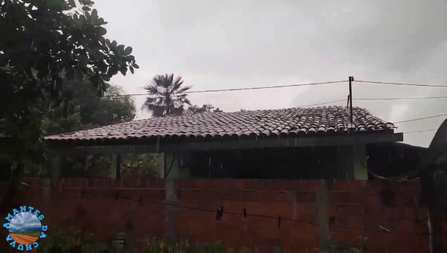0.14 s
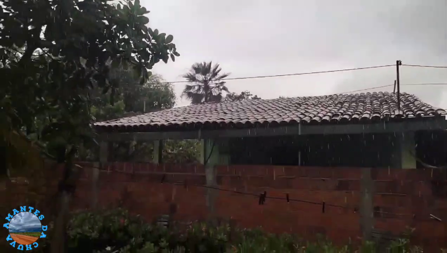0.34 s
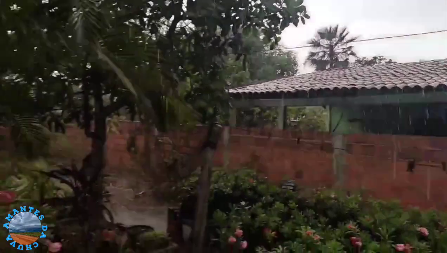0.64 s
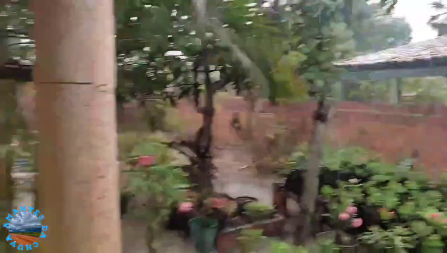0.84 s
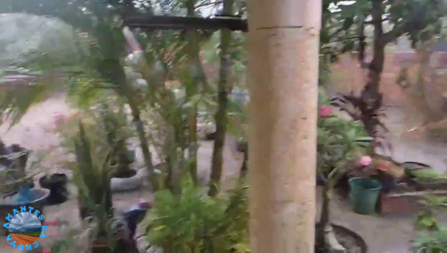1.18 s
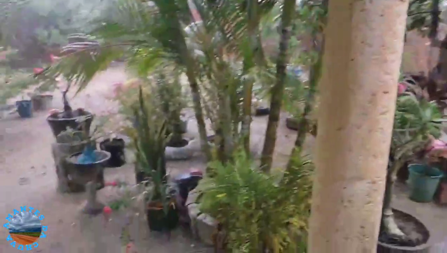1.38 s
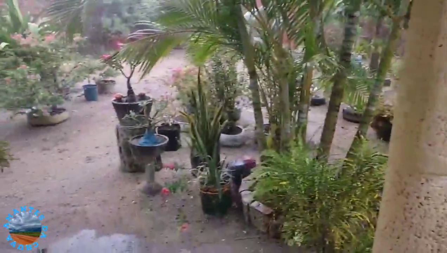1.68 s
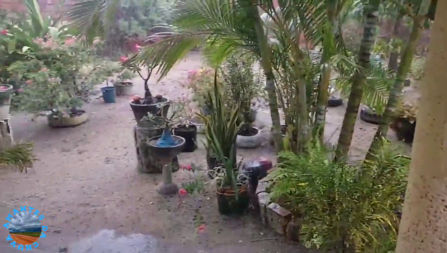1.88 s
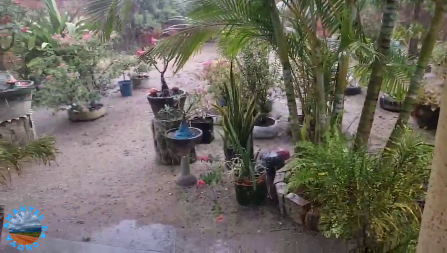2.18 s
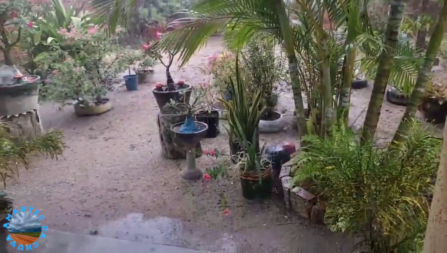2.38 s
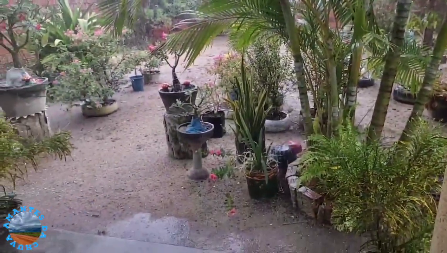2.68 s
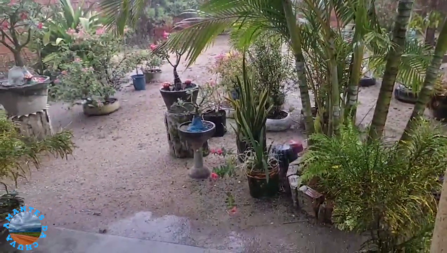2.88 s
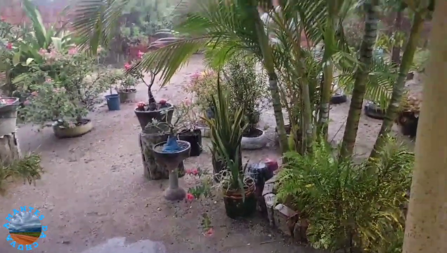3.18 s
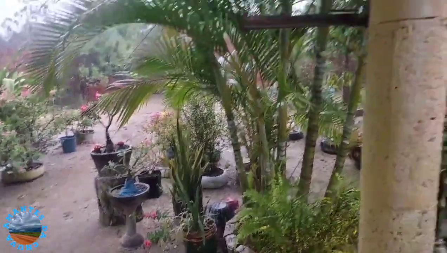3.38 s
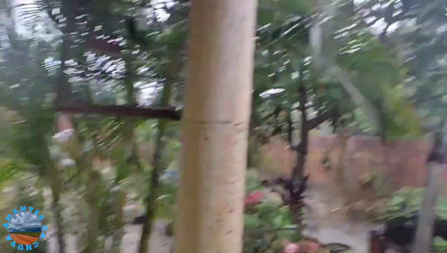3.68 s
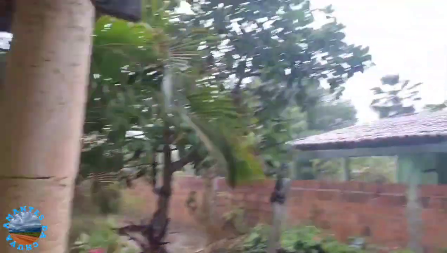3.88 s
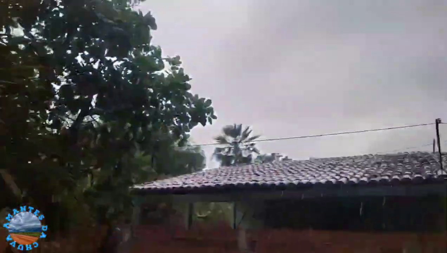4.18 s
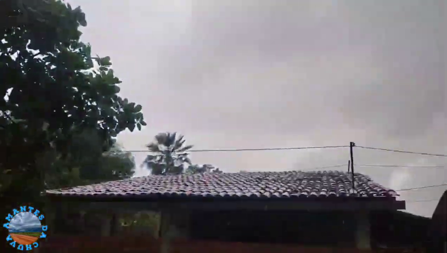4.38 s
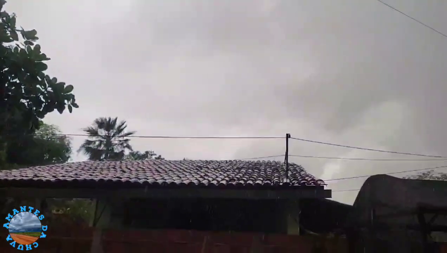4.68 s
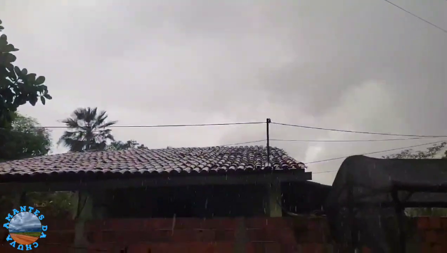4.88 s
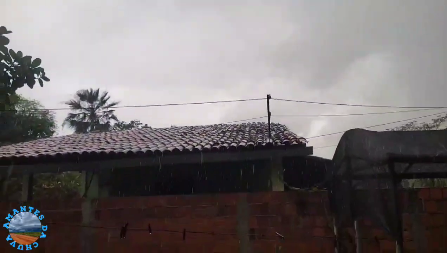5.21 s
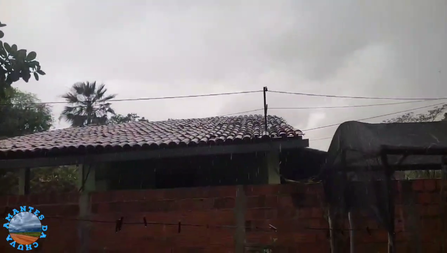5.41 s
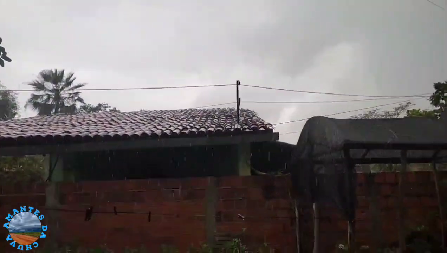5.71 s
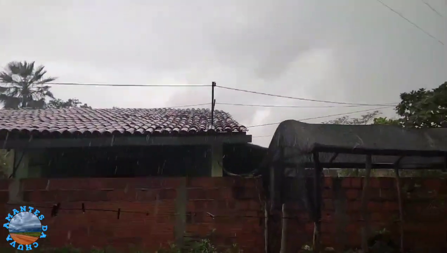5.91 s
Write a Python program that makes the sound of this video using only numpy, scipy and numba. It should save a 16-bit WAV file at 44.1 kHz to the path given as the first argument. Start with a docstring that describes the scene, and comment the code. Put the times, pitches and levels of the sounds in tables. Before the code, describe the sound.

Steady rain hisses over tiled roofs and a garden while close eaves drips slap and tick; a bird chips faintly and the right side briefly dulls.

```python
"""Steady rain on tiled roofs and a garden, heard from a veranda through a hand-held phone.
From the start, far drops merge into a noise wash, nearer ones patter, and damped tones tap and plink;
runoff from the eaves lands throughout as a slap, a click and a spray of fine droplets.
From about 1.3 s a finger, a resonant low-pass, dulls the right microphone and bumps the case at 1.6 s;
falling bird chips echo at 2.1 s, more bumps come near 3.5 s, the right side clears, a last chip at 5.9 s."""
import sys
import numpy as np
from scipy import signal
from scipy.fft import rfft, irfft, next_fast_len
from scipy.io import wavfile
from scipy.ndimage import uniform_filter1d
from numba import njit

SR = 44100
rng = np.random.default_rng(int(sys.argv[2]) if len(sys.argv) > 2 else 0)


def persist_wave(psi):
    """Save psi, clipped to +-1, as 16-bit WAV."""
    counts = np.round(np.clip(psi, -1, 1) * 32767).astype(np.int16)
    wavfile.write(sys.argv[1], SR, np.atleast_2d(counts).T)


N = 266805
MIC_SPACING_M, SOUND_SPEED_M_S = 0.15, 343
TOP_HZ = 14250  # upper edge of the clicks and of the final output


def undb(db):
    """Level to amplitude: 20 dB is a factor of ten."""
    return 10 ** (np.asarray(db) / 20)


def unit(x):
    """Normalisation of mean power: scale to rms 1."""
    return x / np.sqrt(np.mean(x ** 2) + 1e-18)


def shape(points, hz):
    """Spectral envelope: gain at hz, interpolated in dB over log frequency."""
    point_hz, db = np.transpose(points)
    return undb(np.interp(np.log(hz + 1), np.log(point_hz), db))


def colour(x, points):
    """Linear filtering: multiply the spectrum by an envelope of (Hz, dB) points."""
    n = x.shape[-1]
    size = next_fast_len(n)
    gain = shape(points, np.fft.rfftfreq(size, 1 / SR))
    return irfft(rfft(x, size) * gain, size)[..., :n]


def walk(rate):
    """Slow random modulation: levels drawn rate times a second, joined by ramps, spread near 1."""
    hold = int(SR / rate)
    steps = np.repeat(rng.standard_normal(N // hold + 2), hold)
    ramps = 1.5 * uniform_filter1d(steps, hold)
    return ramps[rng.integers(hold):][:N]


def sides(pan_db):
    """Level difference between the ears: left and right gains of mean power 1."""
    return unit(undb(np.array([[pan_db], [-pan_db]]) / 2))


def staggered(sound, lead_s):
    """Arrival-time difference: left and right copies, the left one earlier by lead_s."""
    lead = int(lead_s * SR)
    return np.array([np.roll(sound, max(-lead, 0)), np.roll(sound, max(lead, 0))])


def add(out, start_s, sound):
    """Superposition: mix a short sound in at its time."""
    i = int(np.clip(start_s * SR, 0, N - 1))
    out[:, i:i + sound.shape[1]] += sound[:, :N - i]


def short_rms(x):
    """Energy normalisation: the energy of a sound of rms 1 lasting 2 ms."""
    return unit(x) * np.sqrt(.002 * SR / len(x))


def droplets(n, per_s, spread_db):
    """Random impulse train: many small clicks and few large, independent at each microphone."""
    hit = rng.random((2, n)) < per_s / SR
    size = undb(spread_db * np.minimum(rng.exponential(size=(2, n)), 3.3))
    sign = rng.choice([-1, 1], (2, n))
    return unit(hit * size * sign)


# Spectrum of rain on all roofs and leaves, before the shares below.
# Each row: frequency in Hz, level in dB per Hz.
RAIN_SPECTRUM = [(25, -103), (45, -93), (70, -78.5), (110, -71.5), (170, -69), (265, -63), (350, -63.5),
                 (560, -64), (1000, -60.5), (1800, -59.5), (3000, -62.5), (5500, -69), (9000, -72.5),
                 (14000, -79.5)]
# Share of the rain heard as smooth wash. Each row: frequency in Hz, gain in dB.
WASH_SHARE = [(700, 0), (1800, -2), (3500, -1.1), (7000, -3), (12500, -3.5)]
# a low resonance that the rain keeps ringing
DRONE_HZ, DRONE_WIDTH_HZ, DRONE_DB = 265.5, 30, 3.1


def wash(likeness=0.95, flicker_db=0.65):
    """Diffuse field of countless far drops: both microphones agree only on the long waves."""
    size = next_fast_len(N)
    hz = np.fft.rfftfreq(size, 1 / SR)
    mid, side = rfft(rng.standard_normal((2, size)))
    # coherence of the two microphones falls as a sinc of spacing over wavelength
    wavelengths = MIC_SPACING_M * hz / SOUND_SPEED_M_S
    alike = likeness * np.sinc(2 * wavelengths)
    mid = mid * np.sqrt((1 + alike) / 2)
    side = side * np.sqrt((1 - alike) / 2)
    detuning = 2 * (hz - DRONE_HZ) / DRONE_WIDTH_HZ
    mid = mid * undb(DRONE_DB / (1 + detuning ** 2))
    field = np.array([mid + side, mid - side]) * shape(RAIN_SPECTRUM, hz) * shape(WASH_SHARE, hz)
    # each octave above 200 Hz flickers on its own; the lowest band takes in all below
    octave = np.floor(np.log2(np.maximum(hz, 200) / 200))
    out = np.zeros((2, N))
    for k in np.unique(octave):
        band = irfft(field * (octave == k), size)[:, :N]
        out += band * undb(flicker_db * walk(9))
    return out


# Share of the rain heard as separate drops. Each row: frequency in Hz, gain in dB.
PATTER_SHARE = [(300, -46), (1000, -21), (2500, -8.5), (7000, -19), (12500, -3.5)]


def patter(per_s=2200, spread_db=3.5, flurry_db=1.8):
    """Shot noise: nearer drops tap on leaves, tiles and wet sand in small flurries."""
    taps = droplets(N, per_s, spread_db) * undb(flurry_db * walk(12))
    return colour(colour(taps, RAIN_SPECTRUM), PATTER_SHARE)


def leaf_taps(db=-31, scatter_db=-1.0, hz=2900, cycles=3.0, pan_spread_db=7, count=360):
    """Heavily damped resonance: raindrops tap the nearest leaves and pots, each at its own pitch."""
    out, t = np.zeros((2, N)), np.arange(512) / SR
    for when, size, pitch, place in rng.uniform(-1, 1, (count, 4)):
        turns = hz * 2 ** pitch * t  # cycles elapsed
        envelope = turns * np.exp(-2 * turns / cycles)
        tap = short_rms(np.sin(2 * np.pi * turns) * envelope)
        pair = staggered(tap, place * MIC_SPACING_M / SOUND_SPEED_M_S)
        gains = undb(db + scatter_db * size) * sides(pan_spread_db * place)
        add(out, abs(when) * N / SR, gains * pair)
    return out


def puddle_plinks(db=-39, scatter_db=4, hz=1250, cycles=9, rise=0.078, pan_spread_db=5, count=260):
    """Bubble resonance: drops in puddles and pots trap air that rings briefly and rises in pitch."""
    out, t = np.zeros((2, N)), np.arange(2048) / SR
    for when, size, pitch, place in rng.uniform(-1, 1, (count, 4)):
        turns = hz * 2.4 ** pitch * t  # cycles elapsed, before the rise
        rising = turns * (1 + rise * turns / cycles / 2)
        ring = np.sin(2 * np.pi * rising) * np.exp(-turns / cycles)
        pair = staggered(ring, place * MIC_SPACING_M / SOUND_SPEED_M_S)
        gains = undb(db + scatter_db * size) * sides(pan_spread_db * place)
        add(out, abs(when) * N / SR, gains * pair)
    return out


SLAP_LOW_HZ = 2050  # a drop is too small to radiate below this
CLICK_LOW_HZ = 7800  # lower edge of the click of first contact
# the wet ground answers every slap with a duller note: longest decay, and level against the ring
GROUND_HZ, GROUND_DECAY_S, GROUND_DB = 2500, .0004, -9


def slap(db, hz, ring_s, click_db):
    """Impact excitation: a sharp click and a knock that dies in a few cycles; levels are rms over 2 ms."""
    t = np.arange(512) / SR
    ring = np.sin(2 * np.pi * hz * t) * np.exp(-t / ring_s)
    ground = np.sin(2 * np.pi * GROUND_HZ * t) * np.exp(-t / min(GROUND_DECAY_S, 2 * ring_s))
    radiation = signal.butter(4, SLAP_LOW_HZ, "highpass", fs=SR)
    knock = signal.lfilter(*radiation, ring + undb(GROUND_DB) * ground)
    contact = signal.butter(4, [CLICK_LOW_HZ, TOP_HZ], "bandpass", fs=SR)
    click = signal.lfilter(*contact, 1. * (t == 0))
    return undb(db) * short_rms(knock) + undb(click_db) * short_rms(click)


# treble of the spray at 13 kHz, added to how far the click stands above the slap
SPRAY_TREBLE_DB = -3.5
# the microphone that hears a drip more weakly also hears it later
LAG_S_PER_DB = 0.00006


def drip(db, hz, ring_s, click_db, spray_db, spray_s, pan_db):
    """Splash: a drop slaps the wet ground with a spray of droplets, brighter when the click is crisper."""
    t = np.arange(6144) / SR
    hit = slap(db, hz, ring_s, click_db)
    hit = np.pad(hit, (0, len(t) - len(hit)))
    hit = staggered(hit, LAG_S_PER_DB * pan_db)
    treble_db = min(click_db - db + SPRAY_TREBLE_DB, 0)
    body = [(1650, -28), (2350, -3), (np.clip(hz, 2700, 6500), 0), (7000, -7), (13000, treble_db)]
    fine = droplets(len(t), 5000, spread_db=2.2)
    fading = np.exp(-(t / spray_s) ** 2 / 2)
    spray = unit(colour(fine, body)) * fading
    return sides(pan_db) * (hit + undb(spray_db) * spray)


# The biggest drips from the eaves. Each row: start in seconds, slap level in dB, pitch in Hz,
# ring decay in seconds, click level in dB, spray level at its start in dB, spray length in seconds
# (width of its bell-shaped fade), left minus right in dB.
EAVES_DRIPS = [(0.0445, -30, 4000, .0002, -30, -40, .008, 0),
               (0.0555, -28, 7500, .0002, -32, -40, .008, -2),
               (0.228, -25, 3000, .0004, -38, -38, .008, -5), (0.2927, -31, 6500, .0002, -24, -34, .008, 1),
               (0.5105, -24, 3600, .0002, -30, -30, .018, -5),
               (0.5179, -29, 6500, .0002, -29, -34, .012, -5),
               (0.5604, -19.5, 4900, .0006, -29, -29.5, .028, -6),
               (0.590, -26.5, 6500, .0003, -38, -38, .008, -4),
               (0.660, -29, 4500, .0003, -38, -31, .02, -4),
               (0.8165, -19.5, 3400, .0005, -40, -30, .008, 1),
               (0.8201, -16.5, 3050, .0011, -27, -23.5, .02, 0),
               (0.8415, -24, 3600, .0004, -38, -26.5, .018, 0),
               (1.132, -24.5, 3900, .0004, -40, -28.5, .04, 0),
               (1.3275, -26, 2500, .0007, -38, -28, .04, -3), (1.356, -26, 4500, .0003, -35, -31, .02, -3),
               (1.820, -34, 3000, .0002, -30, -36, .012, 4), (1.887, -16.5, 3200, .0006, -42, -25, .012, 2),
               (1.8925, -23, 3200, .0007, -46, -29.5, .032, 0),
               (1.8958, -21, 2900, .0007, -46, -36, .01, -2), (2.3405, -26, 3800, .0004, -33, -33, .015, 2),
               (2.4278, -21.5, 5500, .0003, -34, -31, .02, 4),
               (2.4647, -20.5, 3500, .0003, -40, -33, .01, 4),
               (3.0222, -32, 3000, .0002, -30, -32, .022, 2),
               (3.0868, -18, 3000, .0003, -26, -25, .021, 1.5),
               (3.093, -23, 2900, .0008, -46, -28, .018, 0),
               (3.3485, -24, 5000, .0002, -26.5, -28.5, .03, 1.5),
               (3.4235, -24, 3900, .0006, -45, -30, .012, 4), (3.595, -32, 3200, .0004, -46, -33, .06, -6),
               (3.8152, -28, 5000, .0003, -44, -27.5, .011, -1),
               (3.8805, -28, 3200, .0008, -35, -25.5, .014, -4),
               (4.1352, -28, 3800, .0002, -30, -35, .015, -2),
               (4.232, -30, 4500, .0003, -42, -32, .025, -5),
               (4.2602, -25.5, 4600, .00013, -32, -38, .01, -5),
               (4.3623, -22, 4200, .0003, -38, -31, .018, -7),
               (4.7606, -26.5, 7500, .0002, -31, -42, .008, -1),
               (4.7855, -17, 3300, .0006, -24.5, -30.5, .008, 0),
               (4.807, -29, 3000, .0004, -38, -29.5, .035, 0),
               (4.8367, -21, 3200, .0008, -38, -28, .014, -7),
               (4.8793, -24, 2900, .0004, -31, -32, .025, -6),
               (4.946, -20, 3500, .0004, -40, -32, .008, -5),
               (4.954, -20, 4000, .0002, -33, -29.5, .018, -6),
               (4.9614, -20.5, 4200, .0005, -37, -32, .01, -5),
               (4.9742, -20, 7000, .0006, -30, -33, .008, -5),
               (4.984, -24, 6000, .0002, -36, -38, .008, -3),
               (5.1398, -16, 3400, .0006, -30, -27.5, .006, -1.5),
               (5.218, -25, 3800, .0005, -44, -35, .008, -7),
               (5.2273, -21.5, 5000, .0003, -37, -32, .007, -1),
               (5.2385, -14, 3600, .0003, -20, -26, .02, 0),
               (5.393, -27.5, 7300, .0003, -33, -42, .008, -3),
               (5.464, -29, 7500, .0003, -36, -40, .008, -5), (5.494, -29, 4800, .0004, -43, -32, .016, -4),
               (5.504, -26, 3800, .0003, -44, -38, .008, -5),
               (5.7018, -19.5, 4200, .00015, -25.5, -29, .016, -1.5),
               (5.841, -23.5, 3000, .0004, -33, -28, .035, -2)]


def big_drips():
    """Isolated impacts: runoff from the eaves lands close by."""
    out = np.zeros((2, N))
    for start_s, *landing in EAVES_DRIPS:
        add(out, start_s, drip(*landing))
    return out


def small_drips(db=-30, scatter_db=3, hz=4200, ring_s=0.00022, click_db=-7, spray_db=-6, spray_s=0.05,
                pan_db=0, pan_spread_db=5, count=56):
    """Jittered impacts: smaller drips fall all along the roof edge, one at random in each equal span."""
    out = np.zeros((2, N))
    for k, (when, size, pitch, place) in enumerate(rng.uniform(-1, 1, (count, 4))):
        level = db + scatter_db * size
        pan = pan_db + pan_spread_db * place
        # click and spray levels are relative to the slap
        sound = drip(level, hz * 1.55 ** pitch, ring_s, level + click_db, level + spray_db, spray_s, pan)
        add(out, (k + abs(when)) / count * N / SR, sound)
    return out


# Fingers on the case. Each row: start in seconds, peak level on the right in dB before that
# microphone's filters, contact time in seconds.
FINGER_BUMPS = [(1.6045, -30, .0016), (3.4445, -17.5, .0006), (3.466, -31, .0014), (3.4885, -22.5, .0007),
                (3.514, -27.5, .0009), (3.5515, -24.5, .0008)]
BUMP_PAN_DB = -33  # left minus right: the fingers sit at the right microphone


def fingers(low_hz=95, high_hz=330):
    """Stick-slip friction: each slip of a fingertip is one short push, heard as a dull thump."""
    out, t = np.zeros((2, N)), np.arange(SR // 10) / SR
    case = signal.butter(2, [low_hz, high_hz], "bandpass", fs=SR, output="sos")
    for start_s, db, contact_s in FINGER_BUMPS:
        push = -t * np.exp(-t / contact_s)
        thump = signal.sosfilt(case, push)
        thump /= abs(thump).max()
        add(out, start_s, undb([[db + BUMP_PAN_DB], [db]]) * thump)
    return out


# Bird chips. Each row: start in seconds, length in seconds, start pitch and end pitch in Hz before
# the wobble, level in dB, left minus right in dB.
BIRD_CHIPS = [(2.114, 0.04, 4290, 3450, -23, -2), (2.148, 0.025, 3760, 3070, -25.5, -2),
              (5.918, 0.0115, 3690, 2650, -21, 0)]


def bird(wobble=.024, walls_db=3.5, walls_s=.04, first_echo_s=0.0081):
    """Frequency glide and reverberation: short, clear falling chips echo from the garden walls."""
    out, t = np.zeros((2, N)), np.arange(SR // 5) / SR
    for start_s, length_s, start_hz, end_hz, db, pan_db in BIRD_CHIPS:
        u = np.linspace(0, 1, int(length_s * SR))
        glide_hz = start_hz * (end_hz / start_hz) ** u
        hz = glide_hz * (1 + wobble * walk(310)[:len(u)])
        envelope = np.sin(np.pi * u ** 1.24) ** 2
        chip = np.sin(2 * np.pi * np.cumsum(hz) / SR) * envelope
        walls = rng.standard_normal((2, len(t))) * np.exp(-t / walls_s) * (t > first_echo_s)
        walls *= undb(walls_db) / np.sqrt(np.sum(walls ** 2) / 2)
        walls[:, 0] = 1  # the direct path
        heard = signal.fftconvolve(walls, chip[None], axes=1)
        add(out, start_s, undb(db) * sides(pan_db) * heard)
    return out


# Strength of the shower. Each row: time in seconds, gain in dB.
SHOWER_STRENGTH = [(0, -.8), (1.5, -1.16), (2.4, -1.5), (3.35, -2), (3.62, -0.3), (3.85, -1.3), (5.2, 0.44),
                   (5.5, 0.6), (6.03, 1.6)]


def scene():
    """Superposition: wash, patter, taps and plinks follow the shower; drips, fingers and bird are added."""
    shower = undb(np.interp(np.arange(N) / SR, *np.transpose(SHOWER_STRENGTH)))
    noise = (wash() + patter()) * np.sqrt(SR / 2)  # makes the spectrum levels per Hz
    rain = (noise + leaf_taps() + puddle_plinks()) * shower
    return rain + big_drips() + small_drips() + fingers() + bird()


# How far a finger covers the right microphone as the grip shifts.
# Each row: time in seconds, cover from 0 (open) to 1 (covered).
FINGER_COVER = [(0, 0.19), (0.9, 0.17), (1.3, 0.49), (1.56, 0.49), (1.65, 0.8), (2.1, 0.89), (3.0, 1),
                (3.43, 0.93), (3.56, 0.59), (4.2, 0.54), (4.55, 0.5), (4.78, 0), (6.03, 0.02)]
OPEN_HZ, COVERED_HZ = 15900, 1720  # cut-off of the gap under the finger
GAP_Q, HALF_COVER_Q = 0.78, 0.58  # sharpness of its resonance, and what half cover adds


def shaded(x, port_share=0.34):
    """Resonant low-pass: the gap's cut-off sinks as the finger closes it; the port resonance loses less."""
    hz, times, frames = signal.stft(x, SR, nperseg=512)
    cover = np.clip(np.interp(times, *np.transpose(FINGER_COVER)), 0, 1)
    cutoff_hz = OPEN_HZ * (COVERED_HZ / OPEN_HZ) ** cover
    ratio = hz[:, None] / cutoff_hz
    q = GAP_Q + HALF_COVER_Q * np.sin(np.pi * cover) ** 2
    gain = 1 / np.hypot(1 - ratio ** 2, ratio / q)
    # towards 13 kHz only this share of the gain in dB applies
    share = np.interp(hz, [8500, 13000], [1, port_share])
    return signal.istft(frames * gain ** share[:, None], SR)[1][:N]


@njit
def peak_hold(size, release):
    """Envelope following: jumps to each peak and decays exponentially."""
    held, envelope = np.empty(len(size)), 0.
    for i in range(len(size)):
        envelope = max(size[i], envelope * release)
        held[i] = envelope
    return held


# Colour of the left microphone, with its port resonance near 12 kHz.
# Each row: frequency in Hz, gain in dB.
LEFT_MIC_COLOUR = [(900.0, 0.35), (1500.0, -1.4), (2300.0, -2), (3300.0, -3), (4500.0, -0.5), (5200.0, -3),
                   (6750.0, 0), (7200.0, -4.5), (8800.0, -2), (10200.0, 2.8), (11400.0, 7), (11900.0, 15),
                   (12800.0, 11.5), (14000.0, 10)]
# Colour of the right microphone, which favours the presence range.
# Each row: frequency in Hz, gain in dB.
RIGHT_MIC_COLOUR = [(900.0, 0.3), (1500.0, 1.1), (2300.0, 2.6), (3300.0, 4.0), (4500.0, 4.6), (5200.0, 2.5),
                    (6750.0, 8.4), (7200.0, 5.8), (8800.0, 3.2), (10200.0, -0.5), (11400.0, -6.3),
                    (11900.0, 3.5), (12800.0, 4.4), (14000.0, 6.4)]


def record(dry):
    """Transduction and limiting: microphones colour, a limiter ducks at sharp ticks, the top is cut."""
    left = colour(dry[0], LEFT_MIC_COLOUR)
    right = shaded(colour(dry[1], RIGHT_MIC_COLOUR))
    mics = np.array([left, right])
    ceiling, release_s = .92, .05
    peaks = peak_hold(abs(mics).max(axis=0), np.exp(-1 / (release_s * SR)))
    limited = mics / np.maximum(peaks / ceiling, 1)
    top_cut = signal.ellip(12, .2, 80, TOP_HZ, fs=SR, output="sos")
    return signal.sosfilt(top_cut, limited)


dry = scene()
out = record(dry)
persist_wave(out)
```